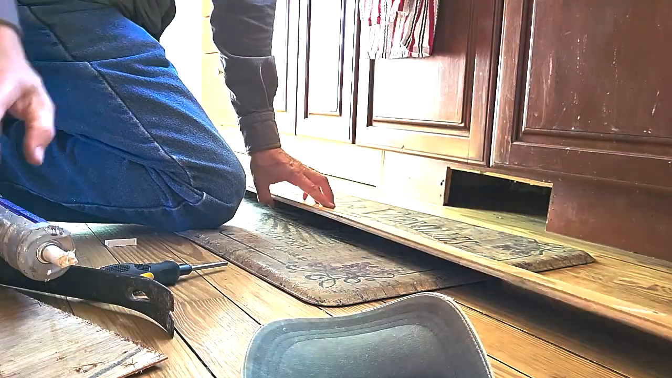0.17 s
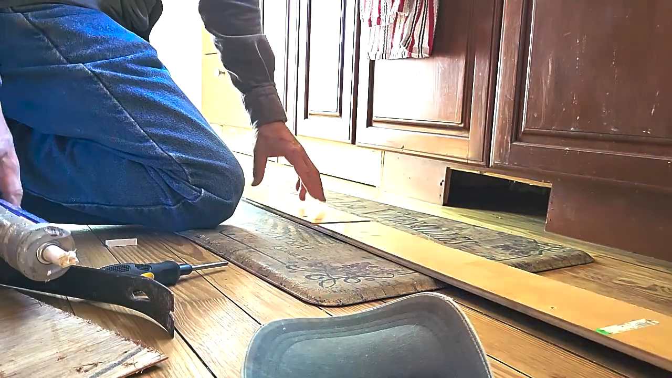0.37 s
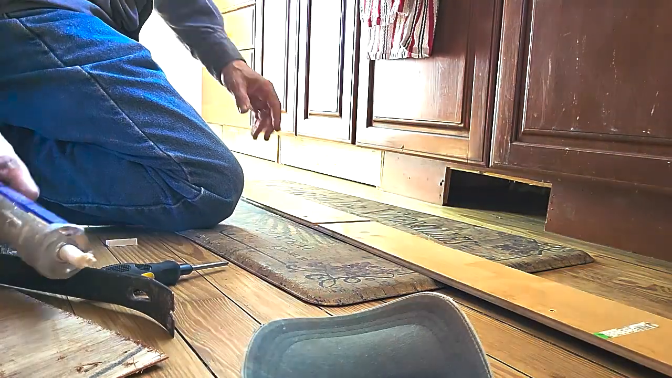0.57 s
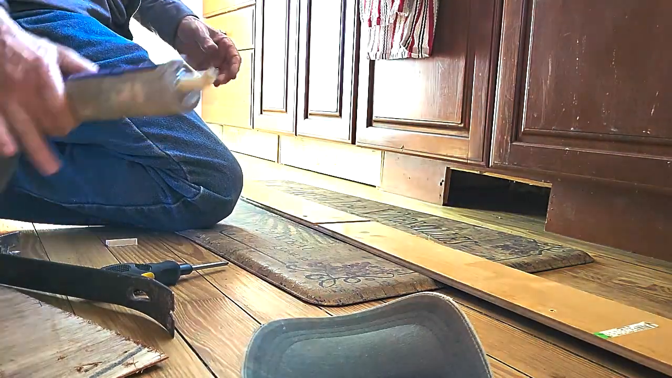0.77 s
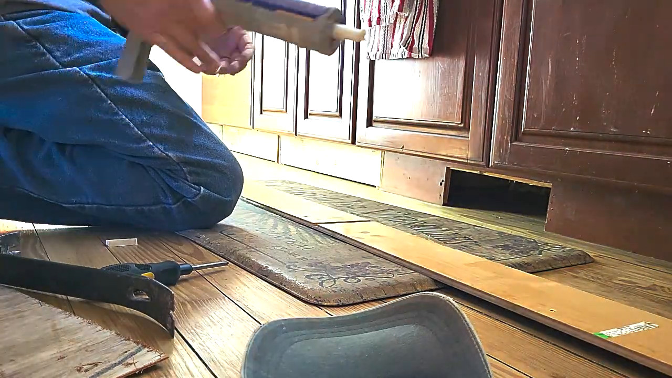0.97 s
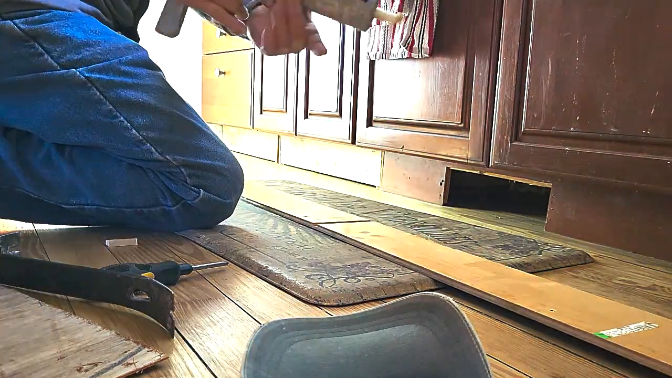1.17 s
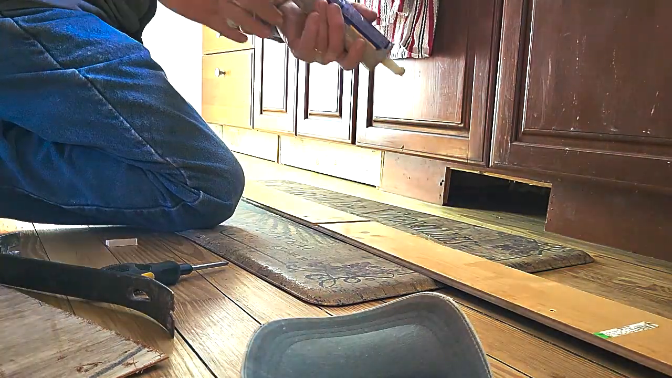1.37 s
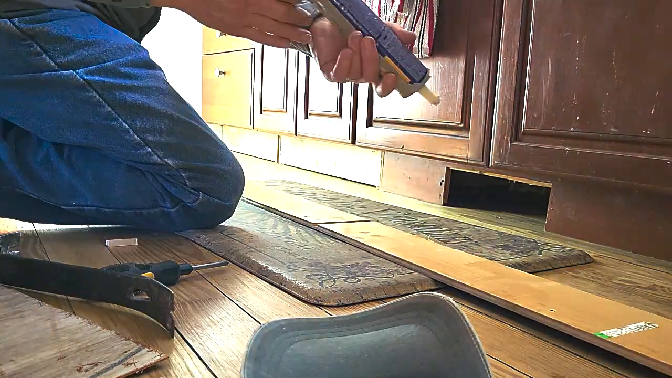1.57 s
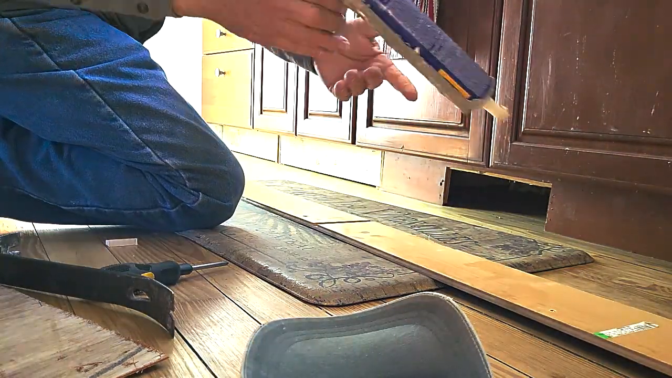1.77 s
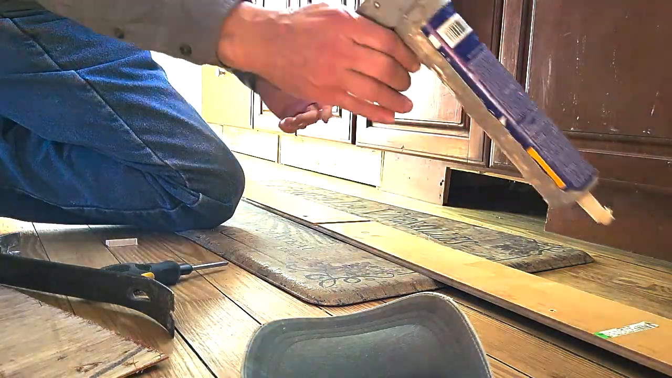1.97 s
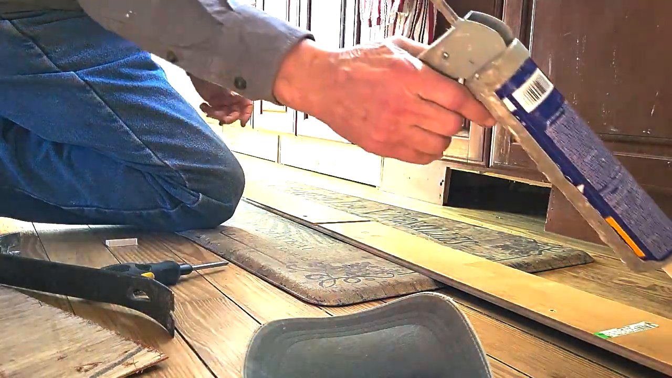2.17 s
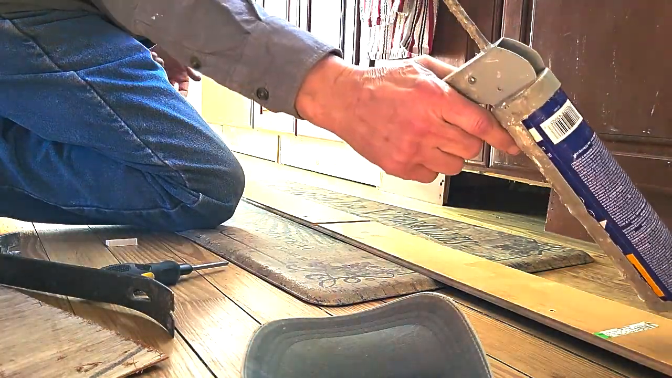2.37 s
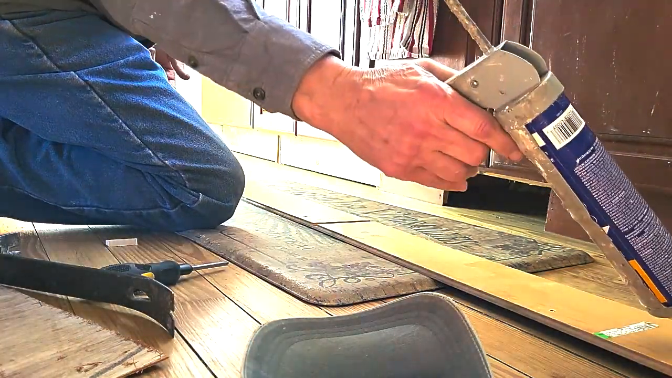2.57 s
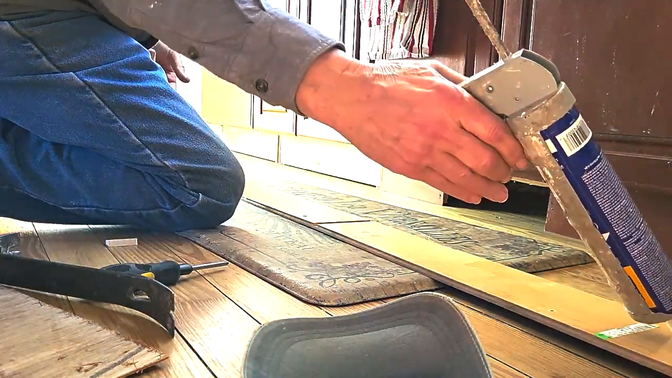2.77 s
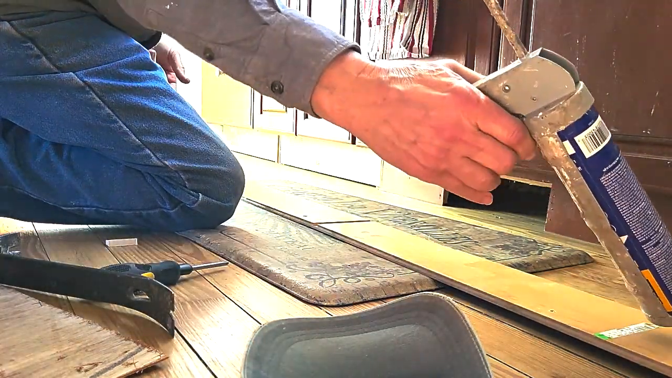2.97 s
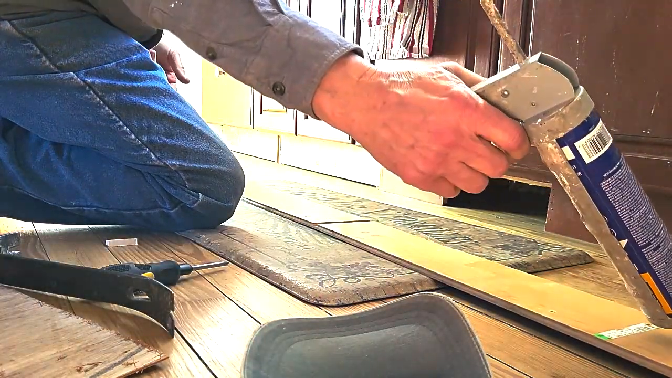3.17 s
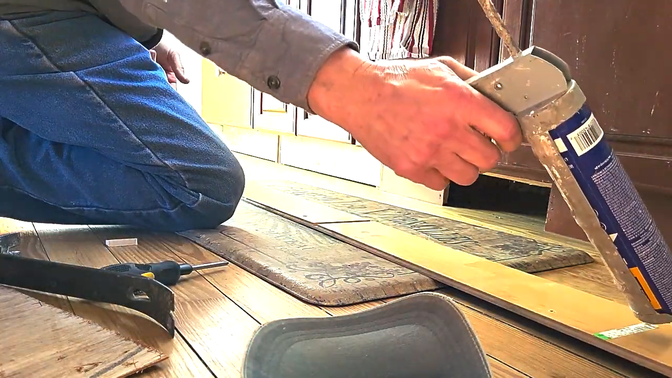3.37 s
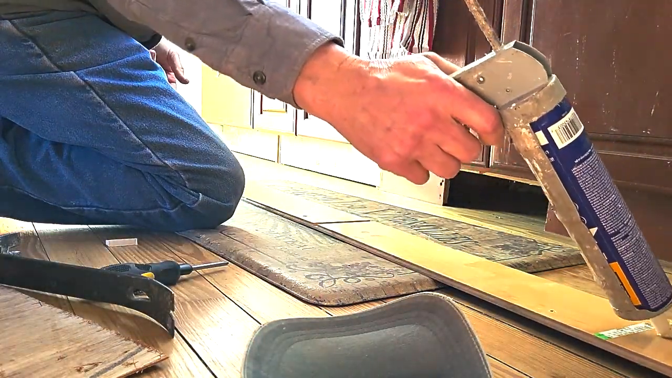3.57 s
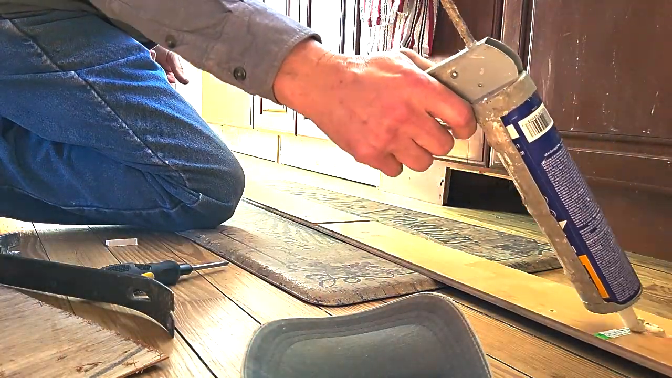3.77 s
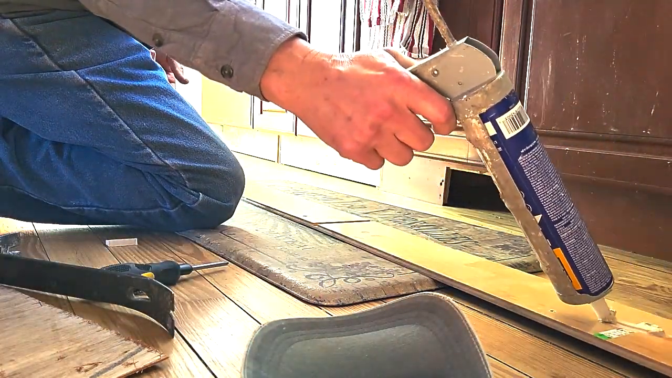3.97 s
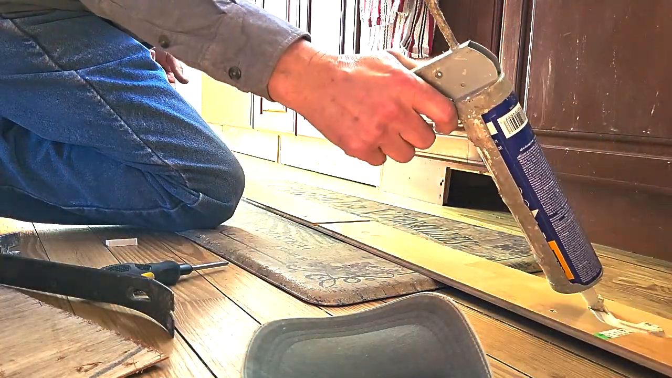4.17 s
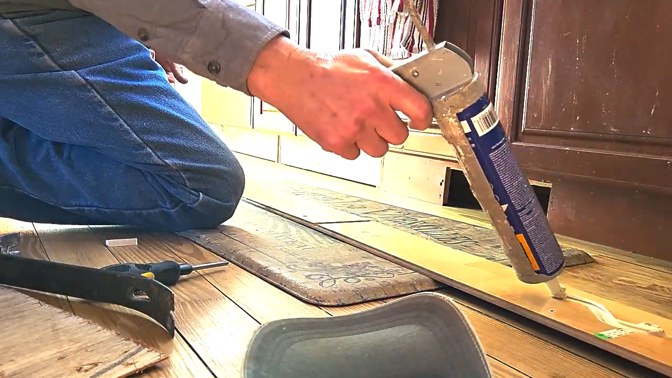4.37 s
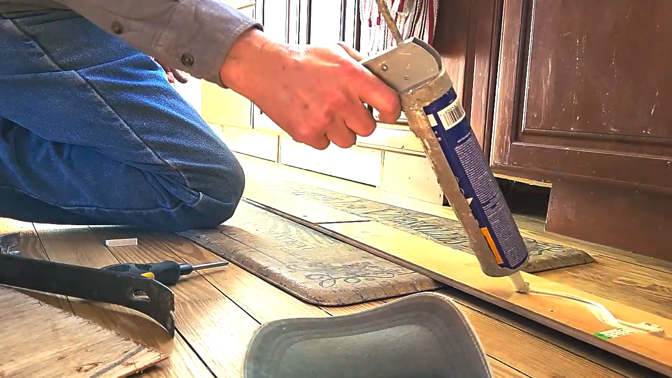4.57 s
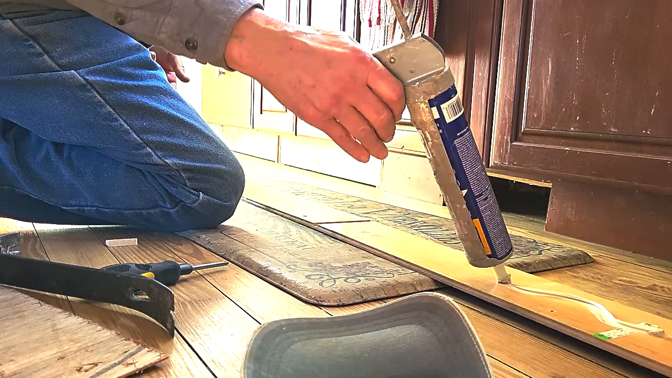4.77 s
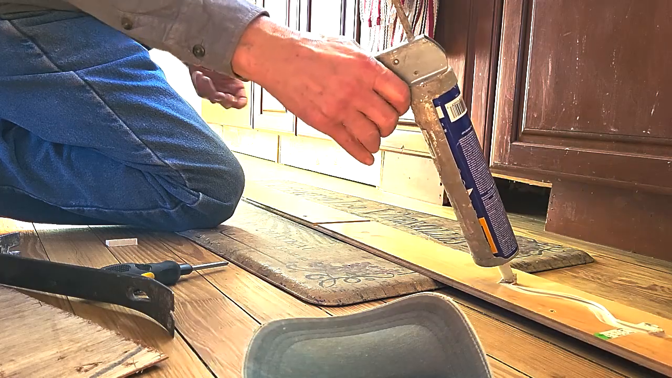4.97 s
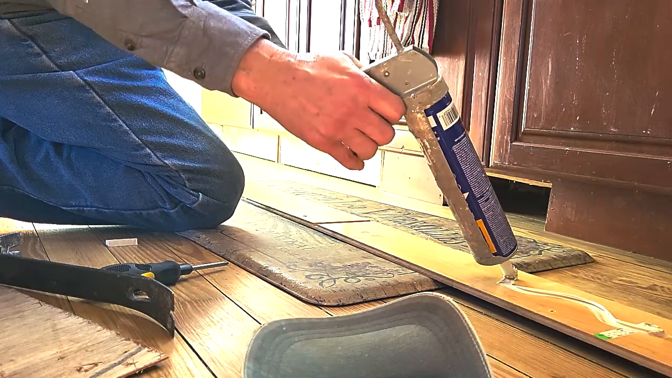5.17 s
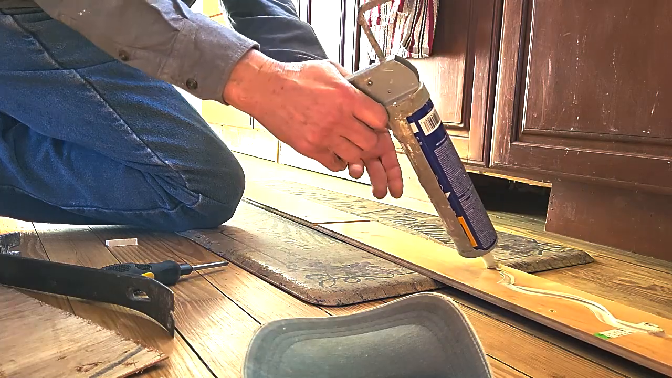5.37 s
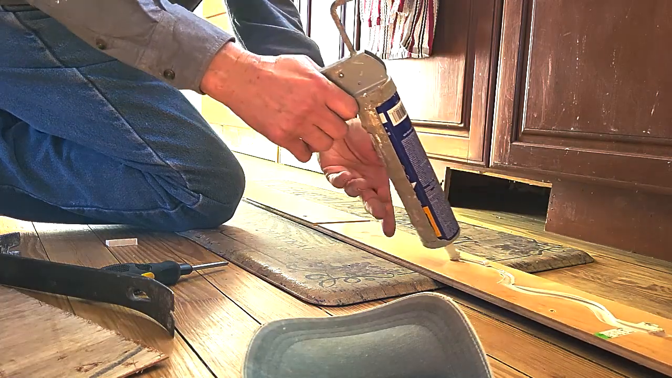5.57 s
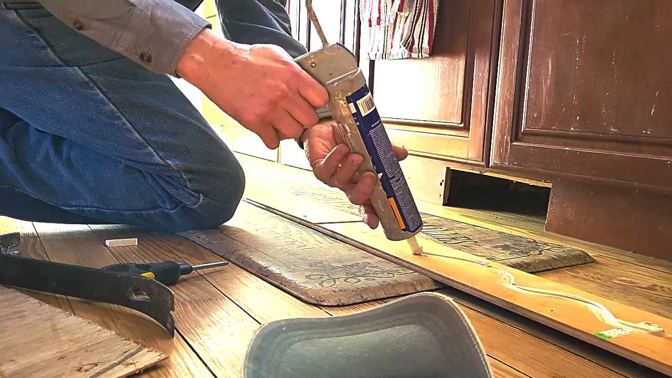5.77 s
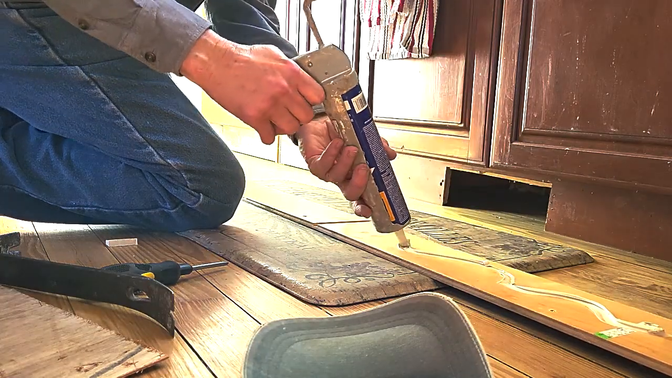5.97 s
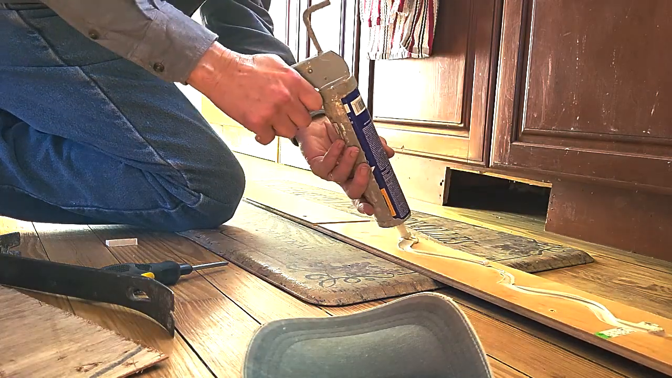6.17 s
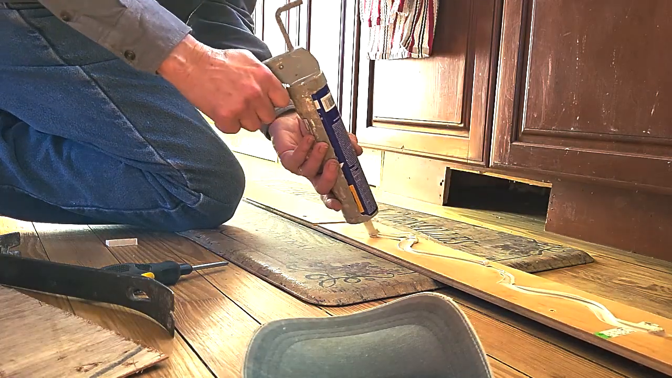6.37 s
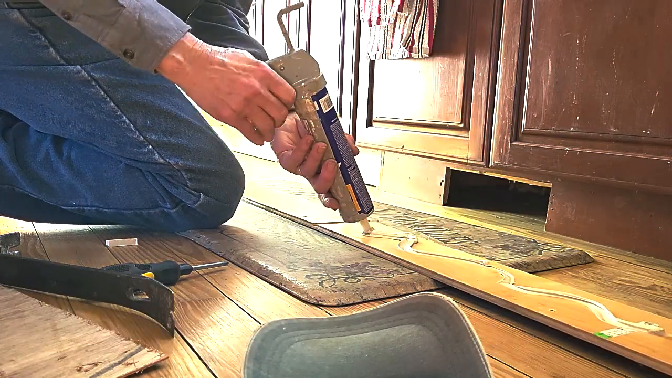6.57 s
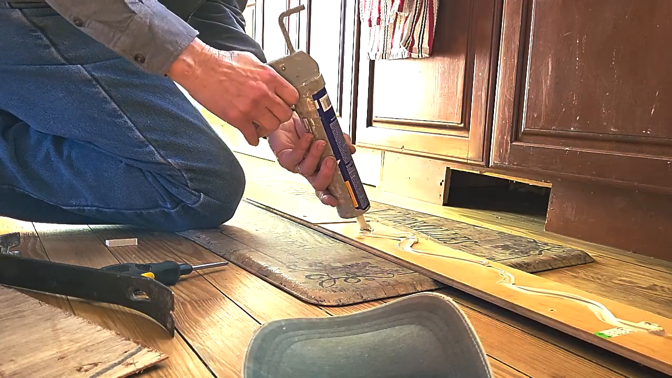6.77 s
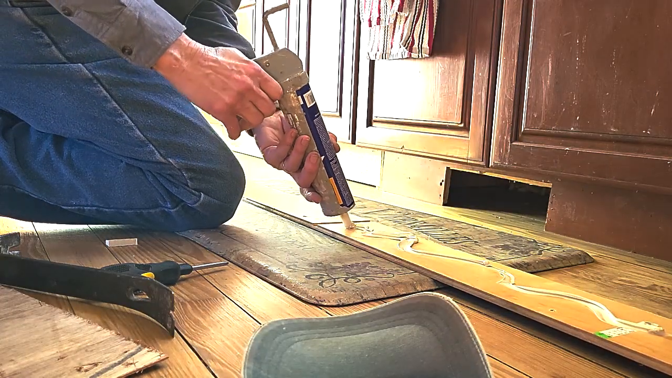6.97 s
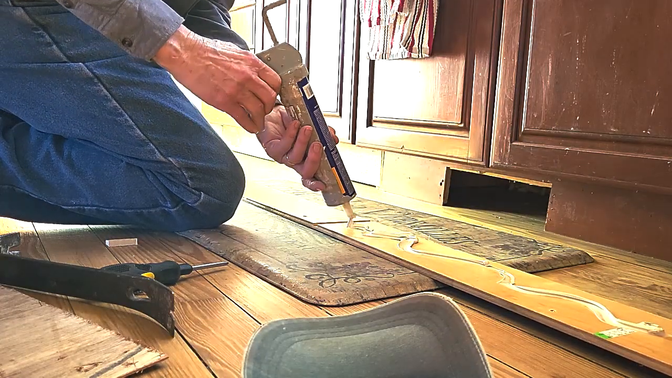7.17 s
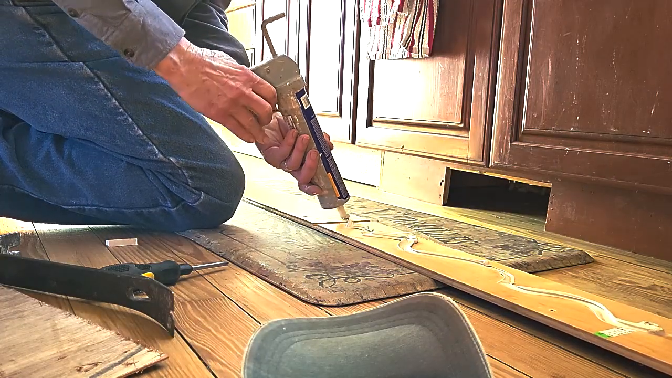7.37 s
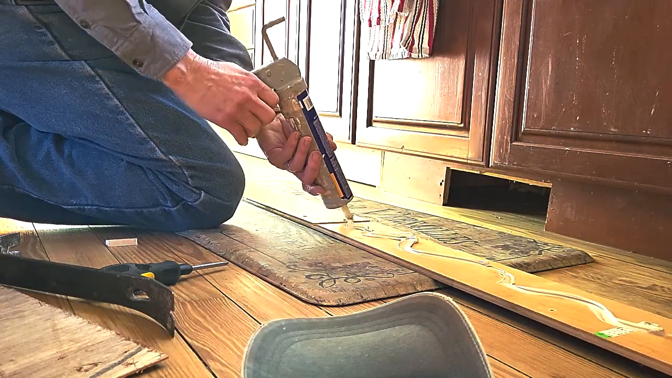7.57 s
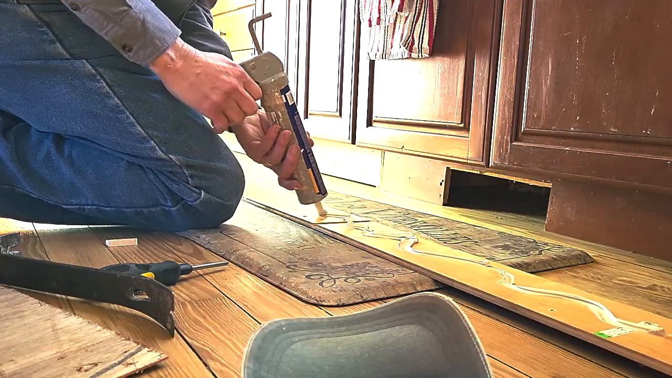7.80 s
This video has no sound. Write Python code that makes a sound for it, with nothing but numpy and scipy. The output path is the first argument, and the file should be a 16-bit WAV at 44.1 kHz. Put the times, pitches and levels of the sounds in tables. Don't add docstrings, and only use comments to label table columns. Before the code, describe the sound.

Close, live-room handling sounds: a sharp plank clack with a low floor thud, then sparse steel clicks, ratchet snaps and faint scraping from a caulking gun.

```python
import sys
import numpy as np
from scipy import signal
from scipy.fft import rfft, irfft, next_fast_len
from scipy.io import wavfile
from scipy.ndimage import uniform_filter1d

SR = 44100
rng = np.random.default_rng(int(sys.argv[2]) if len(sys.argv) > 2 else 0)


def master_out(mix):
    frames = np.transpose(np.atleast_2d(mix))
    ceiling = np.clip(frames, -1, 1)
    pcm = np.round(ceiling * 32767).astype(np.int16)
    wavfile.write(sys.argv[1], SR, pcm)


def level_to_linear(level):
    exponent = np.asarray(level, float) / 20
    return 10 ** exponent


N = 345511
PORT_LAG_S, LEAD_S = .0001, .008

# (low [Hz], high [Hz])
BAND_EDGES_HZ = [(2800, 6000), (1700, 2800), (6000, 15700), (400, 1700)]
BAND_PAN_SHARE = [1, 0.45, 1, 0.68]

# (time [s], peak [dB], weight [dB], sharpness [dB])
PLANK_KNOCKS = [(-0.02, -30, 13, -15), (0.0159, -33, 5.5, -22.5), (0.1156, -24.5, 5.5, -39),
                (0.1391, -34, 9.5, -40), (0.1894, -39.5, 1.5, -28), (0.356, -26, -2, -6),
                (0.3607, -8.5, -5, -12.5), (0.3714, -32.5, -3.5, -8), (0.3844, -33, -1.5, -4.5),
                (0.3994, -21, -10.5, -6.5), (0.4149, -39, -5, -13), (0.4344, -33.5, -2.5, -6.5),
                (0.3400, -50, 11, -18)]
# (time [s], peak [dB], weight [dB], sharpness [dB], contact length [ratio], optional)
GRIPS = [(1.1197, -53, -6, -16), (1.196, -46, 1, -2), (1.2115, -41, -0.5, -2), (1.2435, -30.5, -2.5, 1),
         (1.2782, -19.5, -4, -8, .4), (1.2924, -39, -5, -8)]
# (time [s], peak [dB], weight [dB], sharpness [dB])
TICKS = [(2.0489, -42, -1, -19), (2.43, -31, -7, 3), (2.574, -32, -3.5, 2.5), (2.8221, -42.5, -2.5, -12),
         (2.9345, -49, 1, -20), (4.3895, -33, -4.5, -4), (6.1369, -43, -12, -10), (6.262, -55, -16, 1),
         (6.3948, -61, -6, -3), (6.9672, -57, -7, 2.5), (7.0745, -43.5, -1, -14.5),
         (7.1009, -45.5, -7, -20), (7.1511, -53, 2.5, -20.5), (7.4275, -40, -6, -34)]
# (time [s], peak [dB], weight [dB], sharpness [dB], contact length [ratio], optional)
CLACKS = [(1.7125, -47.5, 8, -0.5), (2.153, -47.5, -2.5, -3.5), (2.1966, -48, -10, -6),
          (2.553, -47, -3, -5), (2.5935, -32, -8, -15), (2.6034, -42, -3, -6),
          (4.5356, -15.5, -30, 5.5, .55), (4.5415, -28, -25, 5, .5)]
# (time [s], peak [dB], weight [dB], sharpness [dB], contact length [ratio])
SNAPS = [(2.2295, -21.5, -11, 1, .7), (2.683, -16.5, -11, -10, .8), (3.2024, -21.5, -14, 6.5, .6),
         (3.2103, -30, -12, 6, .2), (4.705, -36, -3, -2, .6), (4.7092, -19, -5, 2, .9),
         (4.727, -31, -1, -6, 1.2), (6.5135, -38, -2, -6, .5), (6.5165, -26, -4, -0.5, 1.3),
         (6.545, -34, 2, -15, .5), (6.548, -13, -11, -1.5, .6), (6.554, -22, -7, -8, .3),
         (6.5665, -19, -12, -8, .45)]
# (time [s], peak [dB], weight [dB], sharpness [dB])
RATTLE = [(4.7352, -12.5, -7.5, -4), (4.7425, -26.5, -0.5, -8.5), (4.75, -14.5, -7.5, -3),
          (4.7590, -26, 4, -10)]
# (time [s], peak [dB], weight [dB], sharpness [dB])
NOZZLE_TAPS = [(1.8337, -53, 16, 2.5), (3.7814, -68, 17, -6), (3.9105, -59.5, 5.7, -17.5),
               (4.1024, -63.5, 4, -12), (4.2894, -68, 8, -8), (6.3124, -67.5, 4, -4.5),
               (6.4194, -58.5, 3, -4.5)]

# (time [s], peak [dB], pitch [Hz], T60 [s])
PLANK_RINGS = [(0.125, -43, 372, .35), (0.3625, -33, 237, .28), (0.366, -40, 1184, .35),
               (0.385, -46, 953, .5), (0.4, -47, 1190, .25)]
# (time [s], peak [dB], pitch [Hz], T60 [s])
PLANK_EDGE = [(0.0158, -30, 2633, 0.11), (0.1152, -20, 2840, 0.048), (0.365, -24.5, 1185, 0.25)]
# (time [s], peak [dB], pitch [Hz], T60 [s])
CARTRIDGE_THUMPS = [(0.568, -35.5, 343, 0.11), (1.197, -36, 330, 0.08), (1.21, -35, 365, 0.09),
                    (1.714, -31, 362, 0.08), (1.828, -41.5, 338, 0.049), (2.056, -45, 342, 0.071),
                    (2.174, -34.5, 325, 0.051), (2.232, -39, 346, 0.11), (2.562, -44, 363, 0.39),
                    (2.599, -41, 357.6, 0.14), (2.691, -32, 347, 0.066), (3.009, -38.5, 348, 0.048),
                    (4.395, -40.5, 290, 0.045), (4.762, -28, 304.6, 0.11), (6.562, -40.5, 337, 0.13)]
# (time [s], peak [dB], pitch [Hz], T60 [s])
STRIKE_BLIPS = [(1.834, -58, 1900, .25), (4.391, -52, 2500, .2), (4.1025, -58, 1900, .06),
                (6.4208, -57, 2000, .07), (6.263, -65, 7850, .07), (6.293, -66, 7850, .06),
                (6.375, -69, 7850, .3), (6.375, -66, 5400, .15), (7.4285, -55, 2400, .25),
                (7.4285, -58, 4300, .2), (1.285, -54, 1136, .4), (1.279, -47, 1766, .4),
                (1.2795, -35, 3580, .1), (1.279, -39, 3149, .12), (2.431, -46, 1545, .12),
                (2.431, -42, 2643, .1), (2.6, -46, 2000, .08), (2.685, -36, 4500, .07),
                (2.688, -38, 4950, .07), (3.2035, -32, 7289, .1), (3.2035, -35, 8134, .12),
                (3.2035, -38, 4188, .12), (3.7823, -57, 824, .05), (3.7823, -52, 2277, .05),
                (3.7823, -59, 1750, .03), (3.9113, -55, 2340, .045), (3.9113, -65, 3100, .03),
                (4.537, -30, 7000, .06), (4.537, -32, 4250, .06), (4.74, -32, 2390, .28),
                (4.757, -32, 2160, .12), (6.549, -34, 2500, .15), (6.549, -34, 2720, .1),
                (6.549, -33, 2950, .12), (6.55, -33, 3350, .08), (6.595, -44, 2220, .4),
                (6.39, -69, 2900, .3)]
# (time [s], peak [dB], pitch [Hz])
ROD_RINGS = [(1.8337, -49.5, 2000), (2.2318, -38.5, 2115), (2.9347, -48.5, 2000), (3.2041, -36, 1990),
             (4.2248, -62, 1990), (4.2901, -51.5, 1990), (4.7363, -23.5, 1990), (4.7514, -27, 2466),
             (6.5495, -22, 2260), (7.0746, -50, 2105), (7.1496, -52.5, 2240), (7.4272, -40.5, 2390)]
# (time [s], peak [dB], pitch [Hz])
LOADED_ROD_RINGS = [(3.785, -70, 2280), (3.915, -70, 2340), (4.1031, -62, 1990), (4.7584, -44, 2300),
                    (6.3124, -59, 1953), (6.4208, -63, 2010), (6.5495, -39.5, 2230)]
# (time [s], peak [dB], pitch [Hz])
FRAME_PINGS = [(2.228, -22.5, 5300), (2.593, -30, 5240), (2.6823, -28.5, 2820), (6.1384, -36.5, 4880),
               (6.2941, -52, 4870)]

# (peak time [s], peak [dB], rise [s], fall [s])
FLOOR_BOOM = [(0.06, -33.5, 0.2, -0.11), (0.13, -34.5, 0.1, 0.17), (0.39, -38.5, 0.2, 0.41),
              (0.56, -62.5, 0.08, -0.4), (1.282, -48.5, 0.08, 0.09), (2.644, -57, 0.11, -0.74),
              (2.76, -47, 0.067, 0.27)]
# (peak time [s], peak [dB], rise [s], fall [s])
PLANK_THUD = [(0.06, -38.5, 0.058, 0.04), (0.13, -37.5, 0.035, 0.12), (0.368, -27, 0.03, 0.071),
              (0.5, -47.5, 0.18, 0.2), (1.244, -43, 0.07, 0.047), (2.588, -50, 0.067, 0.11),
              (2.76, -46, 0.016, 0.09)]
# (peak time [s], peak [dB], rise [s], fall [s], sheen over 9 kHz [dB])
RUB = [(0.105, -52.5, 0.3, 0.032, -14.5), (0.33, -57.5, 0.38, 0.067, -17), (0.72, -73.5, 0.14, 0.25, -7),
       (1.0, -60.5, 0.17, 0.13, -13.5), (1.134, -63, 0.042, 0.027, -19), (1.19, -61.5, 0.034, 0.02, -11),
       (1.72, -56.5, 0.29, 0.072, -8.5), (1.842, -58, 0.015, 0.015, -28), (2.04, -71, 0.44, 0.02, -13),
       (3.02, -71.5, 0.3, 0.4, -13), (4.274, -71.5, 0.07, 0.3, -17), (4.95, -67, 0.12, 0.12, -25),
       (5.2, -76.5, 0.28, 0.64, -17.5), (5.98, -73.5, 0.29, 0.46, -33.5),
       (6.12, -76.5, 0.017, 0.018, -20.5), (6.394, -66, 0.067, 0.065, -17), (6.5, -66, 0.037, 0.03, -12.5),
       (7.11, -73, 0.034, 0.04, -4), (7.178, -79.5, 0.08, 0.47, -15)]
# (peak time [s], peak [dB], rise [s], fall [s])
ROD_CREEP = [(1.17, -71.5, 0.45, 0.03), (1.86, -65, 0.023, 0.14), (2.02, -77.5, 0.41, 0.03),
             (2.98, -67, 0.025, 0.22), (3.11, -75, 0.035, 0.045), (3.19, -68, 0.059, 0.02),
             (4.13, -73, 0.13, 0.6), (4.3, -75.5, 0.091, 0.3), (5.0, -67, 0.4, 0.4), (5.33, -93, 0.3, 0.6),
             (5.95, -73.5, 0.22, 0.25)]
# (peak time [s], peak [dB], rise [s], fall [s])
NOZZLE_DRAG = [(1.02, -73, .2, .2), (5.2, -68, .3, .35), (5.46, -74, .15, .2)]

# (frequency [Hz], width [Hz], level [dB])
PLANK_MODES = [(102, 28, -0.5), (242, 27, -1), (937, 53, -20.5), (1194, 41, 16), (1870, 13, -4),
               (2310, 34, -15), (2820, 71, -19), (3050, 27, -32)]
# (frequency [Hz], width [Hz], level [dB])
FRAME_MODES = [(2000, 130, -7), (2390, 75, -7.5), (2810, 33, -5.5), (4330, 500, -1), (4845, 71, 2.5),
               (4950, 50, -8.5), (6070, 40, -6.5), (7380, 810, 8.5)]
# (frequency [Hz], width [Hz], level [dB])
ROD_MODES = [(1840, 88, 3.5), (1990, 29, 5.5), (2160, 150, 0), (2500, 56, -15)]
# (frequency [Hz], width [Hz], level [dB])
NOZZLE_MODES = [(1800, 110, 0), (2300, 140, -1), (2750, 80, -9)]
# (frequency [Hz], width [Hz], level [dB])
FRIDGE_HUM = [(61.45, 5.2, -63), (118.8, 1.7, -62.5), (181.2, 6.5, -69), (247.8, 2.4, -71.5),
              (10000, 2, -102), (11600, 2, -103)]

# (frequency [Hz], gain [dB])
WOOD = [(400, 8.5), (1000, 8.5), (2000, -3.5), (3000, -4), (4000, -6), (7500, -5), (9000, -6), (16000, -19)]
# (frequency [Hz], gain [dB])
STEEL = [(400, -2), (1000, -4.5), (1500, -5), (2100, 7), (3000, -3), (4500, -3.5), (7500, -5), (9000, -5.5),
         (11000, -8), (14000, -2), (16000, -6)]
# (frequency [Hz], gain [dB])
PALM = [(400, 0), (1200, 7), (2200, 0), (3500, 4.5), (5000, -1.5), (7000, 5), (9000, -10), (16000, -6)]
# (frequency [Hz], density [dB per Hz])
CLOTH = [(710, -47), (1200, -25), (1910, -9.5), (2260, -0.5), (2720, -10), (2910, -2), (6640, -3),
         (9000, -11.5), (11700, -40), (19800, -120)]
# (frequency [Hz], density [dB per Hz])
AIR = [(12, -52.5), (20, -5), (64, -9.5), (86, -12.5), (123, -0.5), (147, -14), (186, -7), (216, -12.5),
       (318, -17.5), (700, -33), (910, -59.5), (1540, -120)]
# (frequency [Hz], density [dB per Hz])
HISS = [(410, -22), (700, -1.5), (767, -6.5), (819, -2), (1140, -5), (1240, -14), (1520, -15.5),
        (2190, -13.5), (2530, -21), (3280, -19.5), (6320, -15.5), (8530, -22), (10400, -24.5),
        (16000, -29.5)]
# (frequency [Hz], side minus mid [dB])
AIR_SIDE = [(60, -18), (110, -16.5), (200, -18.5), (380, -6.5), (700, -4.5), (1290, -2.5), (2380, -4),
            (4400, 0.5), (8120, 0), (15000, -12)]
# (frequency [Hz], T60 [s])
ROOM_T60 = [(100, 0.26), (500, 0.65), (2000, 0.58), (5000, 0.42), (9000, 0.35), (12000, 0.28),
            (16000, 0.37)]

# (time [s], left minus right [dB])
PLANK_SIDE = [(0.016, 3), (0.115, 1), (0.19, -11), (0.37, -7), (0.43, 4)]
# (time [s], left minus right [dB])
GUN_SIDE = [(1.1, -1), (1.28, -5.5), (1.75, 1), (2.25, -4), (3.2, -13.5), (4.0, -3), (4.6, -5.5), (6.3, -4),
            (7.4, -2)]


def table(rows, hz):
    rows = np.array(rows)
    return np.interp(np.log(hz + 1), np.log(rows[:, 0]), rows[:, 1])


def colour(x, gain):
    size = next_fast_len(x.shape[-1])
    hz = np.arange(size // 2 + 1) * SR / size
    return irfft(rfft(x, size) * gain(hz), size)[..., :x.shape[-1]]


def unit(x):
    return x / np.sqrt(np.mean(x ** 2))


def band(x, lo_hz, hi_hz):
    return signal.sosfilt(signal.butter(3, (lo_hz, hi_hz), "band", fs=SR, output="sos"), x)


def walk(rate_hz):
    hold = int(SR / rate_hz)
    steps = np.repeat(rng.standard_normal(N // hold + 1), hold)
    return 1.2 * uniform_filter1d(steps, hold)[:N]


def add(track, time_s, x):
    i = int(time_s * SR)
    x = x[max(-i, 0):N - i]
    start = max(i, 0)
    track[start:start + len(x)] += x


def ports(left, right, lag_s):
    late = colour(left, lambda hz: np.exp(-2j * np.pi * hz * lag_s))
    return np.array([late, right])


def resonances(rows):
    return lambda hz: sum(level_to_linear(db) / (1 + 2j * (hz - f) / w) for f, w, db in rows)


def swells(rows, extra_db=0):
    t, out = np.arange(0, N, 20) / SR, 0
    for (peak_s, db, rise_s, fall_s, *_), more_db in zip(rows, np.resize(extra_db, len(rows))):
        away = np.maximum((peak_s - t) / max(rise_s, .01), (t - peak_s) / max(fall_s, .01))
        out = out + level_to_linear(db + more_db - 20 * away)
    return uniform_filter1d(np.repeat(out, 20)[:N], size=700, mode="nearest")


def hits(rows, body, chatter_s, rise_s, buzz_s, buzz_db, alike, deep_db, side):
    lead = np.arange(4096) / SR - LEAD_S
    t = np.maximum(lead, 0)
    buzz = level_to_linear(buzz_db) * np.exp(-t / buzz_s)
    rise = np.minimum(t / rise_s, 1)
    scrape = level_to_linear(-25) * np.exp(-np.abs(lead) / 0.002)
    impulse = signal.unit_impulse(len(t), int(LEAD_S * SR))
    out = np.zeros((3, N))
    for time_s, db, weight_db, sharp_db, *contact in rows:
        length = contact[0] if contact else 1
        fade = (np.exp(-(t / chatter_s / length) ** 2) + buzz * length) * rise + scrape
        chatter = rng.standard_normal((2, len(t))) * fade
        chatter[0] = alike * chatter[1] + np.sqrt(1 - alike ** 2) * chatter[0]
        rel_db = (0, weight_db, sharp_db, weight_db + deep_db)
        pan_db = np.interp(time_s, *np.array(side).T) * np.array([[.5], [-.5], [0]])
        hit = 0
        for band_db, share, (lo_hz, hi_hz) in zip(rel_db, BAND_PAN_SHARE, BAND_EDGES_HZ):
            part = band(np.vstack([chatter, impulse]), lo_hz, hi_hz)
            part[2] = part[2] * np.std(part[1]) / np.std(part[2]) + .4 * part[0]
            hit = hit + level_to_linear(db + band_db + share * pan_db) * part / np.abs(part[1]).max()
        for track, x in zip(out, hit):
            add(track, time_s - LEAD_S, x)
    out = colour(out, lambda hz: level_to_linear(table(body, hz)))
    return ports(out[0], out[1], PORT_LAG_S), out[2]


def rings(rows, rise_s, blip_s, tail_db, split, twin_db, waver_db):
    t, out = np.arange(SR // 2) / SR, np.zeros(N)
    waver = level_to_linear(waver_db * walk(70))
    for time_s, db, hz, t60_s in rows:
        tail = level_to_linear(tail_db) * np.exp(-np.log(1000) * t / t60_s)
        tail = tail * np.resize(waver[int(time_s * SR):], len(t))
        fade = (np.exp(-t / blip_s) + tail) * (1 - np.exp(-t / rise_s))
        twin = level_to_linear(twin_db) * np.sin(2 * np.pi * hz * split * t)
        add(out, time_s, level_to_linear(db) * fade * (np.sin(2 * np.pi * hz * t) + twin))
    return out


def air():
    out = 0
    for rows, db in [(AIR, -56 + .5 * walk(3)), (HISS, -74)]:
        mid = colour(rng.standard_normal(N), lambda hz: level_to_linear(table(rows, hz)))
        side = colour(rng.standard_normal(N), lambda hz: level_to_linear(table(rows, hz) + table(AIR_SIDE, hz)))
        out = out + level_to_linear(db) * (mid + side * np.array([[1], [-1]])) / np.std(mid)
    for f, width_hz, db in FRIDGE_HUM:
        hum = colour(rng.standard_normal(N), lambda hz: 1 / (1 + (2 * (hz - f) / width_hz) ** 2))
        out = out + level_to_linear(db) * unit(hum)
    return out


def plank():
    knock, push = hits(PLANK_KNOCKS, WOOD, chatter_s=0.0031, rise_s=0.00031, buzz_s=0.033,
                       buzz_db=-21.5, alike=0.18, deep_db=-11.5, side=PLANK_SIDE)
    body = lambda hz: 1 + level_to_linear(-15) * resonances(PLANK_MODES)(hz)
    boom = swells(FLOOR_BOOM) * unit(band(rng.standard_normal(N), 40, 150))
    thud = swells(PLANK_THUD) * unit(band(rng.standard_normal(N), 150, 340))
    modes = rings(PLANK_RINGS, rise_s=.002, blip_s=.003, tail_db=0.5, split=1.025, twin_db=-7, waver_db=2.5)
    low = (boom + thud + modes) * level_to_linear(np.array([[.8], [-.8]]))
    return colour(knock, body) + low, level_to_linear(7.5) * colour(push, body)


def plank_edge():
    return level_to_linear(5) * rings(PLANK_EDGE, rise_s=0.00033, blip_s=0.0029, tail_db=-20,
                          split=7 / 8, twin_db=-5.5, waver_db=0)


def rustle():
    grains = rng.standard_normal((2, N)) * level_to_linear(1.5 * walk(60))
    grains[1] = .6 * grains[0] + .8 * grains[1]
    low = unit(colour(grains, lambda hz: level_to_linear(table(CLOTH, hz)) * (hz > 1200) * (hz < 9000)))
    high = unit(band(grains, 9000, 15500))
    sheen_db = np.array(RUB)[:, -1]
    return (swells(RUB) * low + swells(RUB, sheen_db) * high) * level_to_linear(np.array([[-1.5], [1.5]]))


def cartridge():
    return rings(CARTRIDGE_THUMPS, rise_s=0.0036, blip_s=0.0013, tail_db=1.8, split=1, twin_db=-13, waver_db=0)


def creep():
    slips = rng.standard_normal((2, N)) * level_to_linear(2.2 * walk(40))
    rod = swells(ROD_CREEP) * unit(colour(slips, resonances(ROD_MODES)))
    nozzle = swells(NOZZLE_DRAG) * unit(colour(slips[::-1], resonances(NOZZLE_MODES)))
    return rod + nozzle


def grips():
    return hits(GRIPS, PALM, chatter_s=0.0097, rise_s=0.00061, buzz_s=0.021,
                buzz_db=-1, alike=0.16, deep_db=-8.5, side=GUN_SIDE)


def strike_blips():
    return rings(STRIKE_BLIPS, rise_s=.0005, blip_s=.002, tail_db=0.5, split=1.03, twin_db=-8, waver_db=2.5)


def gun_strikes():
    def strike(rows, deep_db):
        return hits(rows, STEEL, chatter_s=0.0087, rise_s=0.00085, buzz_s=0.015,
                    buzz_db=-7, alike=0.087, deep_db=deep_db, side=GUN_SIDE)

    frame = lambda hz: level_to_linear(-2) * (1 + resonances(FRAME_MODES)(hz))
    ticks, ticks_push = strike(TICKS + RATTLE + SNAPS, deep_db=-10.5)
    clacks, clacks_push = strike(CLACKS, deep_db=6.5)
    return colour(ticks + clacks, frame), colour(ticks_push + clacks_push, frame)


def push_rod():
    free = rings([(*row, 0.48) for row in ROD_RINGS], rise_s=.001, blip_s=0.0109,
                 tail_db=-21.5, split=1.05, twin_db=-8, waver_db=4.5)
    loaded = rings([(*row, 0.75) for row in LOADED_ROD_RINGS], rise_s=.001, blip_s=.01,
                   tail_db=-7, split=1.02, twin_db=-7, waver_db=4.2)
    return level_to_linear(1.5) * free + loaded


def nozzle_taps():
    return hits(NOZZLE_TAPS, WOOD, chatter_s=0.0005, rise_s=.0005, buzz_s=.01,
                buzz_db=-17, alike=0.93, deep_db=-11.5, side=GUN_SIDE)


def frame_pings():
    return rings([(*row, 0.14) for row in FRAME_PINGS], rise_s=.001, blip_s=.005,
                 tail_db=-16, split=1.04, twin_db=-3, waver_db=6)


def room(push):
    t, tail = np.arange(int(.9 * SR)) / SR, 0
    for hz in 60 * 2 ** np.arange(0, 8.1, .5):
        mid, side = band(rng.standard_normal((2, len(t))), hz / 2 ** .25, hz * 2 ** .25)
        echoes = mid + min(hz / 700, 1) * side * np.array([[1], [-1]])
        tail = tail + echoes * np.exp(-np.log(1000) * t / table(ROOM_T60, hz))
    tail = tail * np.clip((t - .003) / 0.0065, 0, 1)
    tail = tail / np.sqrt(np.sum(tail ** 2, axis=1, keepdims=True))
    level_db = -7.5 + np.array([[-1.2], [1.2]])
    return level_to_linear(level_db) * signal.fftconvolve(push[None], tail, axes=1)[:, :N]


def scene():
    wood, wood_push = plank()
    tube = cartridge()
    grip, grip_push = grips()
    gun, gun_push = gun_strikes()
    tap, tap_push = nozzle_taps()
    tones = plank_edge() + strike_blips() + push_rod() + frame_pings()

    near = wood + grip + gun + tap
    near = near + ports(tones * level_to_linear(-6.5), tones, PORT_LAG_S)
    near = near + ports(tube, tube * level_to_linear(-6), 0.00024)

    push = wood_push + gun_push + level_to_linear(-1.5) * grip_push + level_to_linear(-6.5) * tap_push
    push = push + level_to_linear(-12) * tones + level_to_linear(-7) * tube
    return near + room(push) + creep() + rustle() + air()


def band_limit(x):
    return signal.sosfilt(signal.butter(12, 16830, fs=SR, output="sos"), x)


def record(dry):
    top_cut = signal.ellip(7, .2, 60, 15800, fs=SR, output="sos")
    rounded = .5 * np.tanh(dry / .5)
    return band_limit(signal.sosfilt(top_cut, rounded))


dry = scene()
out = record(dry)
master_out(out)
```